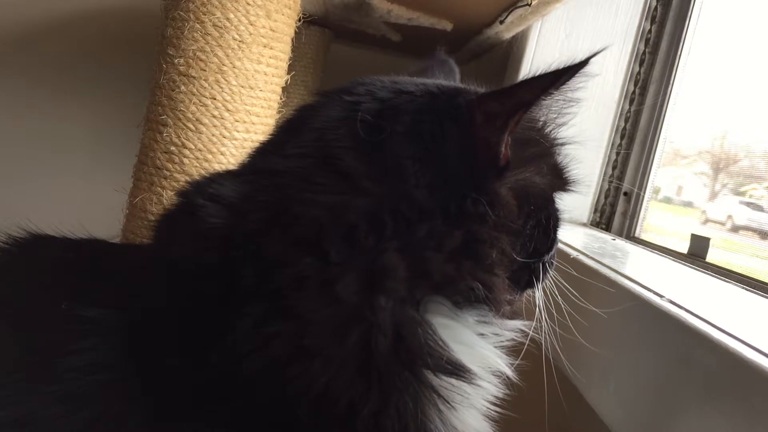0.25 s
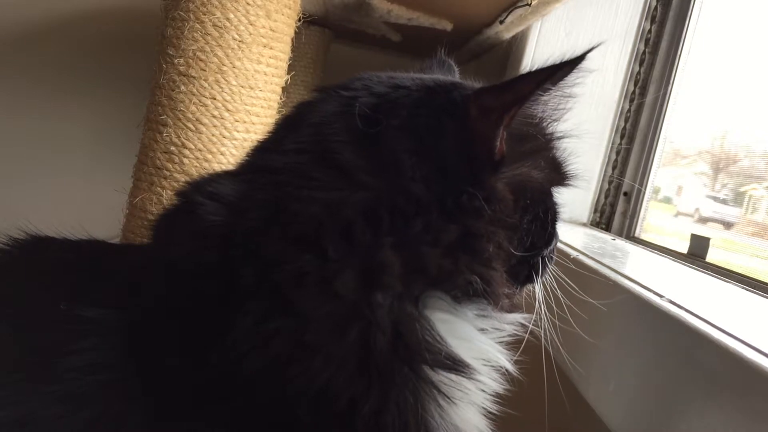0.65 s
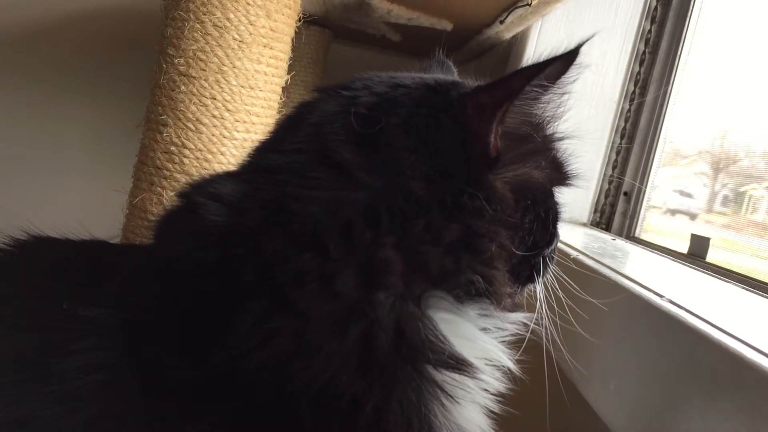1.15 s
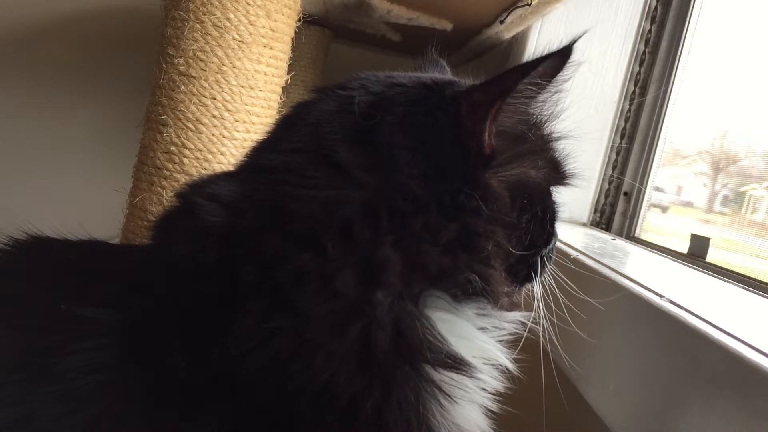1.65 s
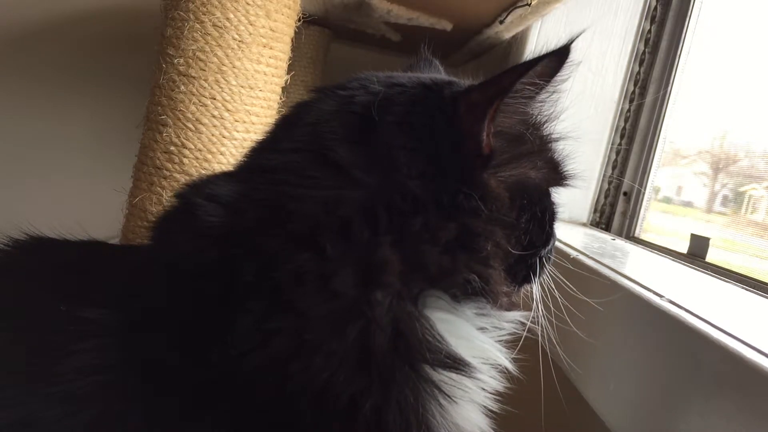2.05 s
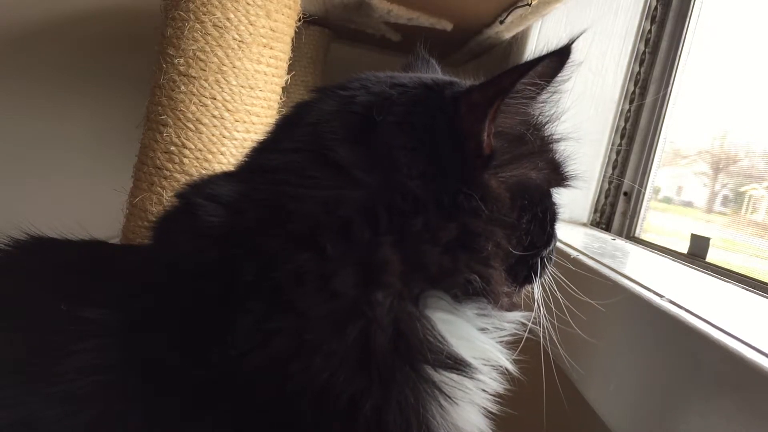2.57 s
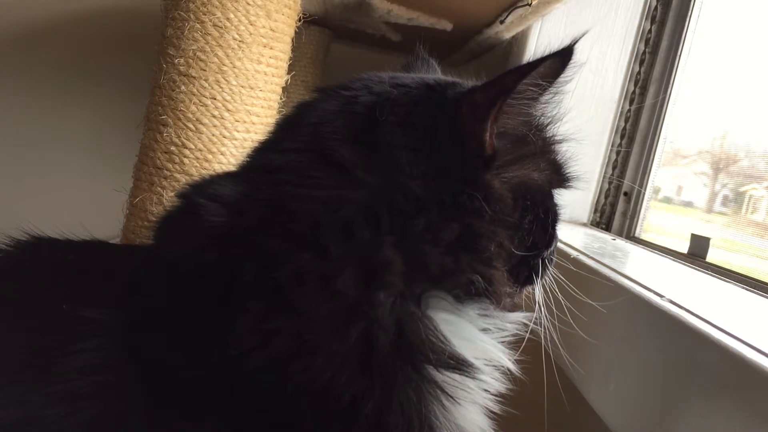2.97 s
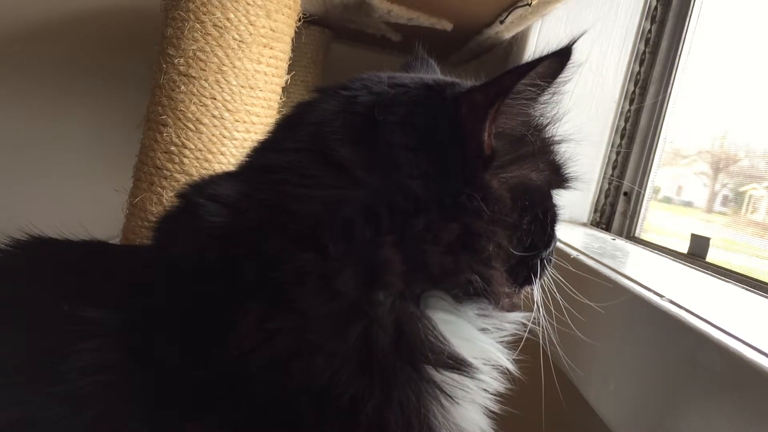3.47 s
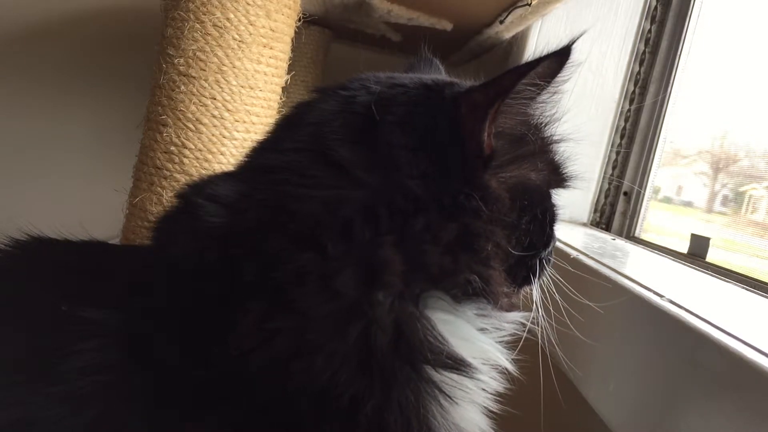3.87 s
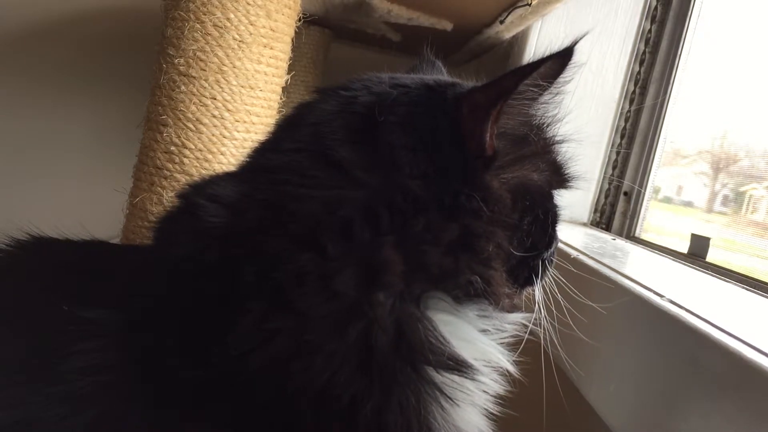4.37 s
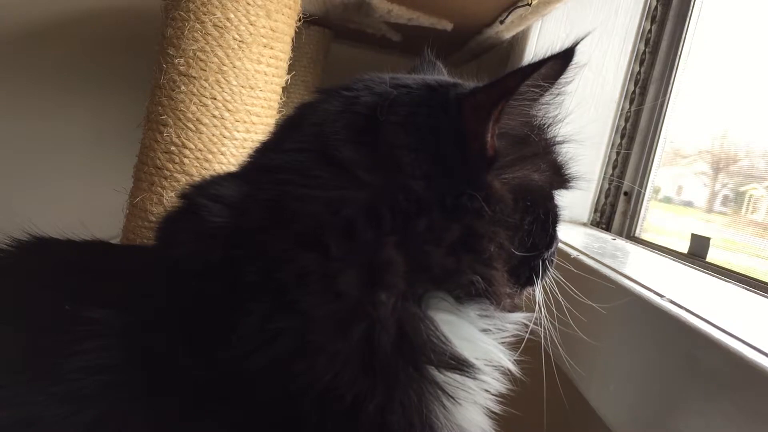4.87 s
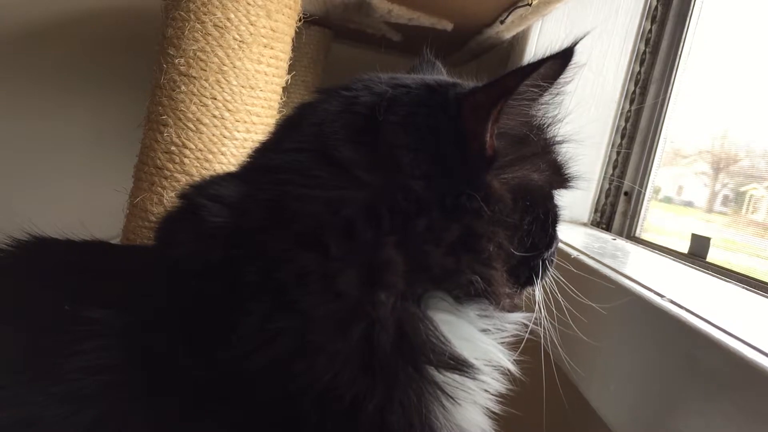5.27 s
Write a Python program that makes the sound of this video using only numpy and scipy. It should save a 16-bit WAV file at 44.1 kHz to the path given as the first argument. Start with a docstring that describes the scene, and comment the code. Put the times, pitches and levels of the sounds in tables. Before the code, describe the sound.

A quiet small room with a very low, soft hush; a cat at a window chatters close to the microphone. At 0 s there is a weak tick and a faint airy breath, fading quickly, with a thin wavering high whistle until about 0.5 s. A single clear click with a dull bump comes near 0.67 s, then a pause. From 1.25 s clicks return, spaced at first, and from 2 to 3.8 s they become a rapid rattle, roughly a dozen a second. Each is a hollow, mid-pitched pop with a short, rough, moist puff of air, varying in strength and colour. Low woody thuds through the perch grow heavier from 2.7 s. After a small gap, another spurt runs 3.95-4.4 s with faint, slightly falling whimpers. Sparser clicks follow from 4.6 s, with strong thuds near 4.95 and 5.1 s, ending around 5.5 s. Short faint reflections trail the clicks.

```python
"""In a quiet room, at a window, a cat on its perch chatters close to the microphone.
Each jaw beat excites the mouth cavity as a decaying pop and lets out filtered noise, a rough puff of air.
Harder beats thud through the perch as a sum of damped modes; short gliding tones whimper faintly among
the beats. A faint thin whistle, a wavering sine, and an airy noise band sound at the start over the hush.
Sparse echoes off glass, sill and walls follow the sounds of the mouth."""
import sys
import numpy as np
from scipy import signal
from scipy.fft import rfft, irfft
from scipy.io import wavfile
from scipy.ndimage import uniform_filter1d

SR = 44100
rng = np.random.default_rng(int(sys.argv[2]) if len(sys.argv) > 2 else 0)


def unload_wav(signal):
    """Save mono or channel-first audio to the path in sys.argv[1] as 16-bit WAV at rate SR, clipped to [-1, 1]."""
    wavfile.write(
        sys.argv[1],
        SR,
        np.round(np.clip(np.atleast_2d(signal).T, -1, 1) * 32767).astype(np.int16),
    )


N = 243431  # samples
T = np.arange(N) / SR  # s


def gain_of(db):
    """Level definition: amplitude ratio of a level in dB."""
    return 10 ** (np.asarray(db) / 20)


def evened(x):
    """Normalisation to unit effective value (rms)."""
    return x / np.sqrt(np.mean(x ** 2) + 1e-20)


def drift(shape, size):
    """Low-pass random modulation: a moving average of noise over size samples, at rms 1."""
    return evened(uniform_filter1d(rng.standard_normal(shape), size=size))


def read(points, hz):
    """Interpolation of a spectrum along a logarithmic frequency axis."""
    f, value = np.transpose(points)
    return np.interp(np.log(hz + 1), np.log(f + 1), value)


def add(mix, s, sound):
    """Linear superposition: adds a sound to the mix from time s, cut at the end."""
    part = mix[round(s * SR):][:len(sound)]
    part += sound[:len(part)]


def coloured(x, gain):
    """Linear filtering by a gain that is a function of frequency, to rms 1."""
    spectrum = rfft(x) * gain(np.fft.rfftfreq(len(x), 1 / SR))
    return evened(irfft(spectrum, len(x)))


def peak(hz, centre_hz, width_hz):
    """Lorentzian resonance curve, 1 at its centre and one half at the edges of its width."""
    return 1 / (1 + (2 * (hz - centre_hz) / width_hz) ** 2)


def step(hz, edge_hz):
    """Steep high-pass response: a smooth rise from 0 to 1 around the edge."""
    return 1 / np.sqrt(1 + (edge_hz / (hz + 1)) ** 12)


def lumpy(level, gain, lumps_db, size):
    """Amplitude modulation: coloured noise that follows a level and comes in lumps."""
    lumps = gain_of(lumps_db * drift(N, size))
    return level * evened(lumps * coloured(rng.standard_normal(N), gain))


def lingering(events, rest_db, share_db, linger_s):
    """Energy addition: a level that each event kicks up and that sinks back to rest."""
    power = gain_of(2 * rest_db) * np.ones(N)
    age = T[:SR] / linger_s
    for s, db, *_ in events:
        add(power, s, gain_of(2 * (db + share_db)) * age * np.exp(1 - age))
    return np.sqrt(power)


def tone(curve, wobble_hz, rough_db):
    """Frequency modulation: a thin wavering sine whose phase integrates its frequency."""
    s, hz, db = np.transpose(curve)
    t = np.arange(s[0], s[-1], 1 / SR)
    wobble, rough = drift((2, len(t)), 300)
    wave = np.sqrt(2) * np.sin(2 * np.pi * np.cumsum(np.interp(t, s, hz) + wobble_hz * wobble) / SR)
    level = gain_of(np.interp(t, s, db) + rough_db * rough)
    return s[0], level * wave * signal.windows.tukey(len(t), .2)


# spectrum of the room's hush: f/Hz, relative level per Hz/dB
HUSH_SPECTRUM = [(15, -54), (25, -34), (48, 2.5), (86, -6), (133, -1), (152, -45), (298, -7), (411, -19.5),
                 (484, -14), (524, -17), (1210, -15.5), (1540, -27), (5760, -29.5), (6410, -31),
                 (15600, -40)]


def room_hush():
    """Stationary random noise: shaped by the room's spectrum, at -65 dB."""
    return gain_of(-65) * coloured(rng.standard_normal(N), lambda f: gain_of(read(HUSH_SPECTRUM, f)))


AIRY_DB, AIRY_FADE_DB_PER_S, AIRY_END_S = -71.5, -19, 0.24


def airy_band():
    """Band-limited noise: two resonances colour a faint breathy sound that ends early."""
    level = gain_of(AIRY_DB + AIRY_FADE_DB_PER_S * T) / (1 + (T / AIRY_END_S) ** 10)
    return lumpy(level, lambda f: peak(f, 2580, 500) + peak(f, 3450, 400), 1.6, size=1500)


RUMBLE_DB = -65.5  # at rest
TREMBLE_DB, TREMBLE_S = -23.5, 0.069  # share of each thud that lingers, and how long


def perch_rumble():
    """Modal filtering: noise through the low perch modes, stirred up by each thud."""
    def low_modes(f):
        return step(f, 43) * sum(gain_of(db) * peak(f, mode, 60) for mode, db in PERCH_MODES if mode < 330)

    return lumpy(lingering(THUD_EVENTS, RUMBLE_DB, TREMBLE_DB, TREMBLE_S), low_modes, 2.5, size=900)


# spectrum of the puffed air: f/Hz, relative level per Hz/dB
PUFF_SPECTRUM = [(240, -9), (400, 2.5), (466, -19.5), (544, -0.5), (653, 0.5), (750, 3.5), (1150, 6.5),
                 (1430, 3.5), (1970, 5.5), (2600, -6), (3640, -7), (4870, -14), (5590, -12.5), (7360, -26),
                 (15600, -30)]
# resonances of head and nook: f/Hz, width/Hz, lift/dB
HEAD_RINGS = [(984, 57, 5), (1174, 20, 5.5), (1421, 77, 4), (1662, 35, 5), (2000, 29, -3), (4076, 61, 8),
              (9200, 910, 0.5), (10500, 260, -14), (13800, 6100, 5)]


def throat(hz):
    """Source-filter principle: the puff's spectrum lifted by the resonances of head and nook."""
    return gain_of(read(PUFF_SPECTRUM, hz) + sum(db * peak(hz, f, w) for f, w, db in HEAD_RINGS))


OPENING_DB, OPENING_S = -15.5, 0.0068  # level relative to the beat, time constant of the rise


def mouth_opening():
    """Exponential growth: the level of the rustling mouth creeps up to each beat and stops there."""
    level = np.zeros(N + SR)  # one spare second in front
    time_left = T[:SR // 10][::-1]
    for s, db, *_ in JAW_BEATS:
        add(level, s + .9, gain_of(db + OPENING_DB) * np.exp(-time_left / OPENING_S))
    return level[SR:]


RUSTLE_DB = -75  # at rest
STIR_DB, STIR_S = -33.5, 0.082  # share of each beat that lingers, and how long


def rustle():
    """Source-filter principle: throat-coloured noise that swells before and lingers after each beat."""
    level = lingering(JAW_BEATS, RUSTLE_DB, STIR_DB, STIR_S) + mouth_opening()
    return lumpy(level, lambda f: throat(f) * step(f, 600), 3.5, size=700)


FIZZ_HZ, HISS_HZ = (3000, 6000), (7600, 14500)  # teeth and lips whistle anywhere in these ranges
HISS_LIFT_DB, CHOP_DB = 6, 2  # hiss resonance; ragged bursts of air across all regions
SWELL_S, SWELL_PER_POP = 0.016, -0.39  # a hard pop lets the air out sooner: dB of swell time per dB of pop


def beat(effort_db, cavity_hz, pop_db, pop_hz, fizz_db, hiss_db, t60):
    """Impulse-excited cavity: a pop as the jaw snaps, with wet crackling air in three swelling bands."""
    t = np.arange(9000) / SR
    hold = SWELL_S * gain_of(SWELL_PER_POP * pop_db)
    flutter = gain_of(1.1 * drift((3, len(t)), 130)) * gain_of(CHOP_DB * drift(len(t), 200))

    # tongue, teeth and lips never sit twice alike: chance resonances
    gaps_hz = np.geomspace(700, 15000, num=70)
    gaps = np.transpose([gaps_hz, 3.58 * rng.standard_normal(len(gaps_hz))])
    snaps = (rng.random(len(t)) < 400 / SR) * rng.laplace(size=len(t))  # saliva threads break
    f = np.fft.rfftfreq(len(t), 1 / SR)
    air = rfft(rng.standard_normal(len(t)) + 0.36 * evened(snaps))
    air = air * throat(f) * gain_of(read(gaps, f))

    def region(share, centre_hz, width_hz, lift_db, lead, quick):
        """Resonant band: starts at the share lead, more softly after a weak pop, then swells and decays."""
        onset = 1 - np.exp(-t / (0.00037 * gain_of(-.6 * pop_db)))
        swell = np.clip(lead + (1 - lead) * t / hold, 0, 1)
        fade = gain_of(-60 * np.maximum(t - hold, 0) / (t60 * quick))
        band = air * share * gain_of(lift_db * peak(f, centre_hz, width_hz))
        return evened(irfft(band, len(t))) * onset * swell * fade

    # smooth crossovers between the three bands
    above_body, above_fizz = step(f, 2760), step(f, 7000)
    body_share = step(f, 386) * np.sqrt(1 - above_body ** 2) * gain_of(2.9 * peak(f, pop_hz, 280))
    fizz_share = above_body * np.sqrt(1 - above_fizz ** 2)
    body = region(body_share, cavity_hz, 145, 7.5, 0.56, 0.95)
    fizz = gain_of(fizz_db) * region(fizz_share, rng.uniform(*FIZZ_HZ), 310, 3.9, 0.53, 0.96)
    hiss = gain_of(hiss_db) * region(above_fizz, rng.uniform(*HISS_HZ), 1300, HISS_LIFT_DB, 0.41, 0.82)

    ringing = np.sin(2 * np.pi * pop_hz * t) + 0.42 * np.sin(2 * np.pi * cavity_hz * t)
    pop = gain_of(pop_db - 60 * t / 0.02) * (1 - np.exp(-t / 0.0016)) * ringing
    pop = pop + 0.092 * np.roll(pop, round(0.013 * SR))  # the pop echoes faintly off the glass 13 ms later
    puff = (flutter * [body, fizz, hiss]).sum(0)
    return gain_of(effort_db) * (1.2 * pop + 0.72 * puff)


# jaw beats: t/s, effort level/dB, cavity f/Hz, pop level/dB, pop f/Hz, fizz level/dB, hiss level/dB,
# nominal decay time T60/s; pop, fizz and hiss relative to effort, before the fixed weights in beat()
JAW_BEATS = [(.01, -48, 990, 3, 1190, -24, -26, 0.049), (0.664, -39, 1170, -4, 1050, -10.5, -20.5, 0.19),
             (1.25, -45, 1920, 14.5, 1670, -0.5, -4.5, 0.17),
             (1.369, -45, 1940, -10, 1650, -16.5, -21, 0.13), (1.511, -52.5, 950, -4, 1240, -25, -27, 0.1),
             (1.542, -44.5, 970, 8.5, 2120, 1, -8, 0.16), (1.655, -59, 920, -1, 930, -14, -43, 0.068),
             (1.671, -42.5, 1980, 3, 1950, -13, -25, 0.18), (1.748, -43.5, 1700, 7, 1760, -1.5, -8.5, 0.21),
             (1.826, -39.5, 1310, 4, 1710, -10.5, -28, 0.16), (2.014, -49, 1030, 4, 1860, -9.5, -26, 0.17),
             (2.073, -52, 1240, 1, 1250, -0.5, -1, 0.12), (2.165, -55, 1190, 12, 1240, -4.5, -24, 0.38),
             (2.189, -43, 1510, 9.5, 1615, -3.5, -10.5, 0.14),
             (2.263, -39.5, 1290, 4, 1110, -10.5, -20, .24), (2.287, -39, 1360, 10, 1185, -6.5, -16, 0.14),
             (2.387, -43, 1540, 6.5, 1570, -13.5, -20.5, 0.11), (2.414, -43.5, 1040, 6, 1030, -5, -8, 0.21),
             (2.488, -36, 1610, 2.5, 1540, -12, -17.5, 0.19), (2.572, -38.5, 1600, 2, 1680, -6, -15, .15),
             (2.669, -49, 990, -17, 1680, -10, -18, 0.27), (2.698, -45, 1650, 8, 1160, 0, -5.5, 0.12),
             (2.785, -38, 1600, -6, 2120, -11, -17.5, 0.12), (2.81, -46.5, 1590, 14.5, 1030, 3, -13, 0.2),
             (2.9, -41, 1570, -11, 1670, -6.5, -19, 0.18), (2.999, -43, 1220, 0, 1680, -18, -21, 0.19),
             (3.019, -42, 1680, 18, 2000, -2.5, -13.5, 0.16),
             (3.091, -42.5, 1600, 15, 1680, -16.5, -20.5, 0.17),
             (3.168, -42, 1490, 14.5, 2000, -4, -11.5, 0.16),
             (3.255, -43, 1620, -1.5, 1700, -5, -12.5, 0.16), (3.34, -41, 1740, 1.5, 2040, -13.5, -20, 0.2),
             (3.376, -49.5, 2310, 12.5, 1900, 0, -8.5, 0.13),
             (3.446, -40.5, 1250, -13, 1620, -11.5, -22.5, 0.11),
             (3.477, -47, 1450, 4, 1490, -2, -11.5, 0.17), (3.56, -39, 1696, 17, 2040, -6, -14, .18),
             (3.646, -44.5, 1610, 14, 1960, -12, -26, 0.22), (3.67, -46, 990, 7, 1720, -3, -8.5, 0.17),
             (3.78, -41.5, 1120, 1, 2260, -13.5, -30, .18), (3.963, -46.5, 1150, 0, 2240, 2.5, -5, 0.12),
             (4.018, -55.5, 1130, 9, 1040, -6, -28, 0.16), (4.05, -43.5, 2080, 4, 1680, -4.5, -8.5, 0.17),
             (4.145, -51.5, 1210, -6, 1130, -22, -23, 0.17), (4.167, -43.5, 1180, 7, 1670, -14, -19, 0.33),
             (4.188, -46.5, 1160, 10, 1335, -3.5, -8, 0.15), (4.255, -45, 1960, 8, 1960, -3.5, -11.5, 0.19),
             (4.293, -39.5, 1620, 11, 1585, -16, -25, 0.15),
             (4.361, -45.5, 1410, 12.5, 2094, -18, -26, 0.16),
             (4.624, -46.5, 1270, 0, 1990, -5.5, -10, 0.13),
             (4.714, -41.5, 1730, 10.5, 1760, -16.5, -29, .15),
             (4.844, -57, 1890, 15.5, 2100, -14, -27, 0.16), (4.908, -53, 2370, 6, 1600, 3, -3.5, 0.16),
             (4.946, -40.5, 1120, 0, 2280, -5, -25, 0.38), (5.017, -50.5, 1680, 7, 1560, 2.5, -6, 0.2),
             (5.104, -38, 1220, 6.5, 1810, -9, -22, 0.18), (5.326, -42, 1000, -7, 1090, -11.5, -20, 0.15),
             (5.353, -49.5, 1050, -12, 1510, 2, -1.5, 0.16), (5.474, -61, 1170, -3, 1720, -36, -24, 0.21),
             (5.507, -44, 1130, -3, 1720, 1.5, -7.5, 0.11)]


def chatter():
    """Linear superposition: every jaw beat at its own time."""
    mouth = np.zeros(N)
    for s, *how in JAW_BEATS:
        add(mouth, s, beat(*how))
    return mouth


def nook(x):
    """Reverberation by convolution: sparse random-sign echoes off glass, sill and walls; lows last longest."""
    at = np.arange(60, SR // 3, 20)
    taps = np.zeros(SR // 3 + 20)
    taps[at + rng.integers(0, 20, len(at))] = rng.choice([-1., 1.], len(at))
    hz, t, z = signal.stft(taps, SR, nperseg=256)
    t60 = read([(500, 0.3), (3000, 0.074), (12000, 0.17)], hz)[:, None]  # f/Hz, T60/s
    tail = signal.istft(z * gain_of(-60 * t / t60), SR, nperseg=256)[1]
    return signal.fftconvolve(x, tail / np.linalg.norm(tail))[:N]


# course of the whistle: t/s, f/Hz, level/dB
WHISTLE_CURVE = [(.09, 8350, -81), (.2, 8500, -83), (.3, 8530, -75), (.4, 8500, -70), (.44, 8690, -71),
                 (.458, 8700, -82), (.465, 8670, -88), (.51, 8750, -87)]


def whistle():
    """Frequency modulation: a faint, thin, high sine that wavers."""
    return tone(WHISTLE_CURVE, 13, 2.4)


LOW_LAG_S = 0.0055  # the low modes answer after the knock
THUD_T60_S, MIDDLE_THUD_DB = 0.14, -47  # decay time at 200 Hz for a thud of this level
T60_PER_DB = -0.0531  # hard thuds are damped sooner: dB of decay time per dB of level
# modes of the perch: f/Hz, level/dB
PERCH_MODES = [(95, 3.5), (133, 4.5), (185, -3.5), (217, 3.5), (255, -2), (310, 0), (350, 0.5), (405, -4.5),
               (458, -2), (540, -14.5), (640, -6.5)]


def thud(level_db, loudest_hz, knock_db):
    """Modal superposition: modes ring and beat; high ones arrive and die first, so pitch seems to sag."""
    t = np.arange(16000) / SR
    hz, db = np.transpose(PERCH_MODES)[..., None]
    low = hz < 300
    t60 = THUD_T60_S * gain_of(T60_PER_DB * (level_db - MIDDLE_THUD_DB))
    weights = gain_of(db + np.where(low, 15.55 * peak(hz, loudest_hz, 122) - 7.5, knock_db))
    # each mode needs a cycle or so to build
    build = 1 - np.exp(-(np.maximum(t - LOW_LAG_S * low, 0) * hz / 0.77) ** 2)
    decay = gain_of(-60 * t / t60 * (hz / 200) ** 0.16)
    turns = hz * rng.uniform(.96, 1.04, hz.shape) * t + .3 * rng.random(hz.shape)
    ring = weights * build * decay * np.sin(2 * np.pi * turns)
    return gain_of(level_db) * .5 * ring.sum(0)


# knocks through the perch: t/s, level/dB (before the fixed weight in thud()), loudest f/Hz,
# level of the upper modes/dB relative to the knock
THUD_EVENTS = [(0.137, -52.5, 121, -14), (0.539, -56, 132, -5.5), (0.675, -44, 234, 3),
               (1.257, -48, 138, -17), (1.377, -49.5, 202, -5), (1.545, -50, 101, -26),
               (1.76, -46.5, 117, -5), (1.83, -48, 220, 6), (2.026, -45.5, 204, -7), (2.079, -46.5, 260, 0),
               (2.204, -50, 134, -10), (2.262, -39, 275, -2.5), (2.399, -47.5, 122, 2.5),
               (2.499, -46.5, 134, 0), (2.579, -44, 107, -10.5), (2.705, -41, 104, -3),
               (2.805, -33, 179, -11), (2.843, -39, 198, -12), (2.906, -33, 208, -4), (2.938, -50, 253, 1),
               (3.029, -42.5, 103, -13), (3.091, -45.5, 217, 1), (3.17, -42, 114, -11),
               (3.261, -46, 100, -9), (3.349, -46.5, 226, 1), (3.385, -38.5, 189, -12),
               (3.452, -33, 222, -.5), (3.485, -39, 238, -4), (3.566, -45.5, 100, 2),
               (3.652, -45, 221, 2.5), (3.684, -34.5, 196, -7), (3.794, -36, 224, -2.5),
               (3.971, -42, 96, -11), (4.062, -43, 93, -17), (4.174, -48.5, 106, -7),
               (4.288, -47, 131, 5.5), (4.443, -72, 129, -14), (4.644, -49, 84, -14),
               (4.718, -54.5, 98, 5.5), (4.909, -54, 81, -11), (4.955, -30.5, 245, -7),
               (5.029, -42, 109, 2), (5.105, -33, 236, 0), (5.144, -42.5, 204, -1), (5.2, -56, 139, -4),
               (5.333, -39.5, 220, -1), (5.398, -50, 129, 2.5)]


def perch_thuds():
    """Linear superposition: every knock through the perch at its own time."""
    perch = np.zeros(N)
    for s, *how in THUD_EVENTS:
        add(perch, s, thud(*how))
    return perch


# faint whimpers among the beats: start t/s, length t/s, start f/Hz, end f/Hz, level/dB
WHIMPER_GLIDES = [(1.19, .03, 1150, 1115, -66), (4.15, .1, 1232, 1090, -64), (4.31, .135, 730, 700, -61),
                  (4.2, .055, 4190, 4130, -66)]


def whimpers():
    """Linear frequency glide: short slides of the voice, each with its start time."""
    for start, length, start_hz, end_hz, db in WHIMPER_GLIDES:
        yield tone([(start, start_hz, db), (start + length, end_hz, db)], 25, 3.8)


def scene():
    """Linear superposition: mouth sounds with their echoes, perch and background noises."""
    mouth = chatter()
    add(mouth, *whistle())
    for start, voice in whimpers():
        add(mouth, start, voice)
    echoes = gain_of(-12.5) * nook(mouth)
    background = room_hush() + airy_band() + perch_rumble() + rustle()
    return (mouth + echoes + perch_thuds() + background)[None]


def record(dry):
    """Band limitation: the microphone drops the deep bass below 55 Hz; a low-pass ends the treble."""
    thin = signal.sosfilt(signal.butter(2, 55, "high", fs=SR, output="sos"), dry)
    low_pass = signal.firwin(511, 15600, window=("kaiser", 9), fs=SR)  # edge in Hz
    return signal.oaconvolve(thin, low_pass[None], "same")


dry = scene()
out = record(dry)
unload_wav(out)
```